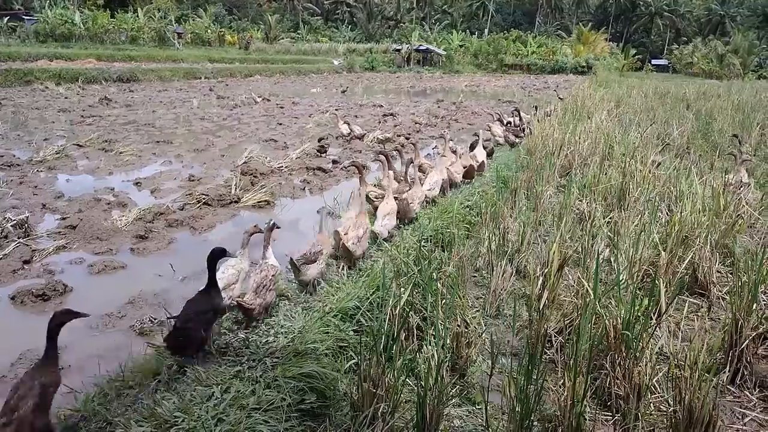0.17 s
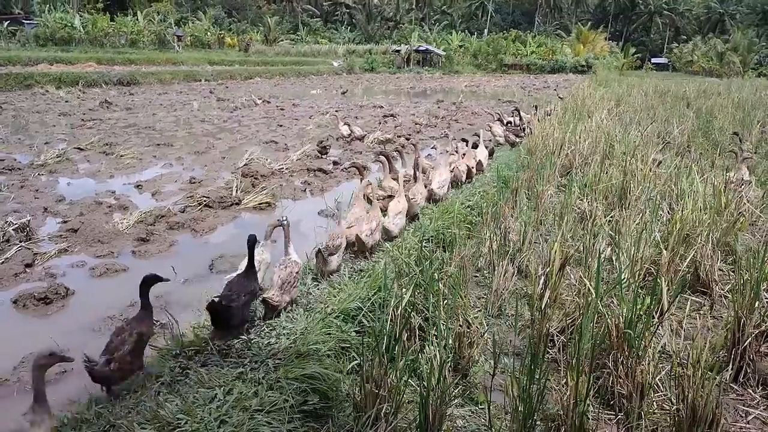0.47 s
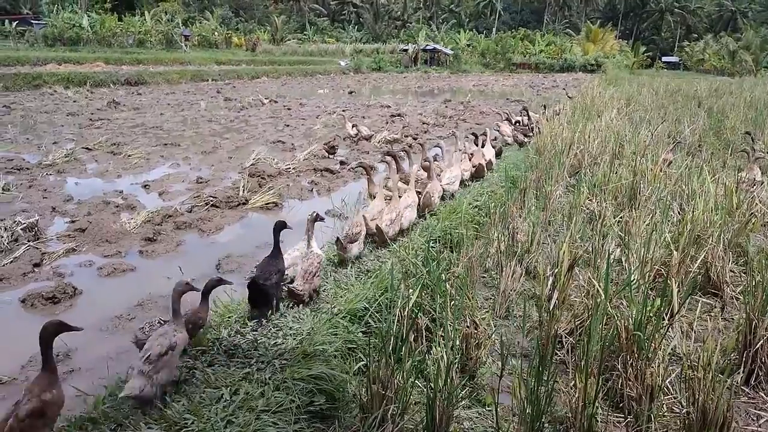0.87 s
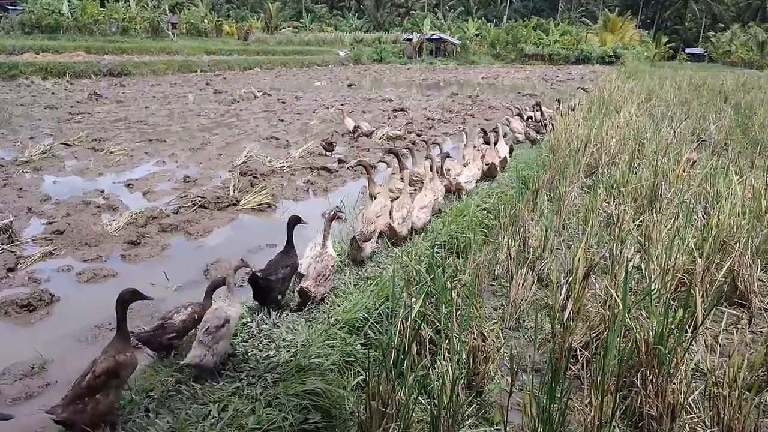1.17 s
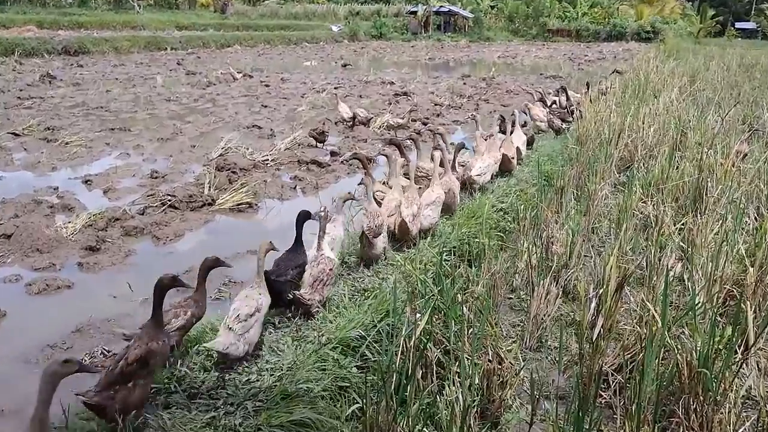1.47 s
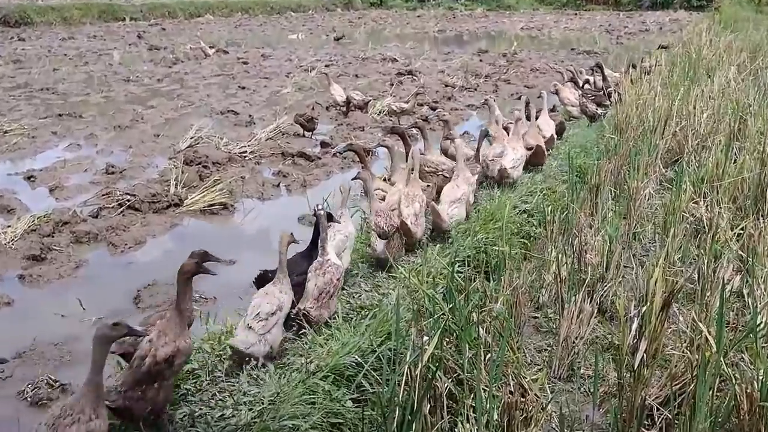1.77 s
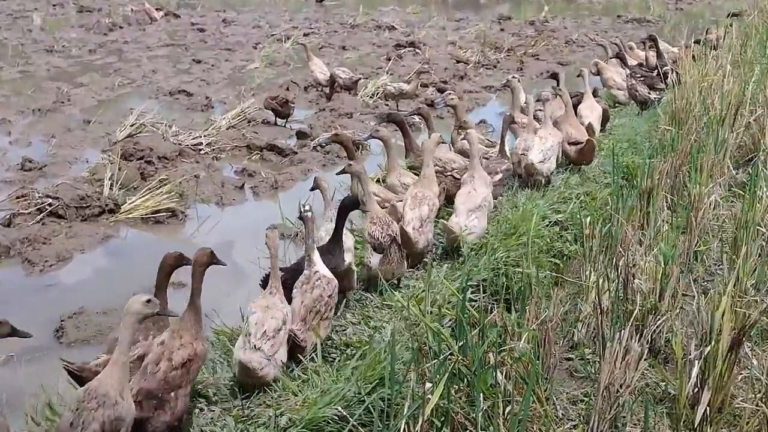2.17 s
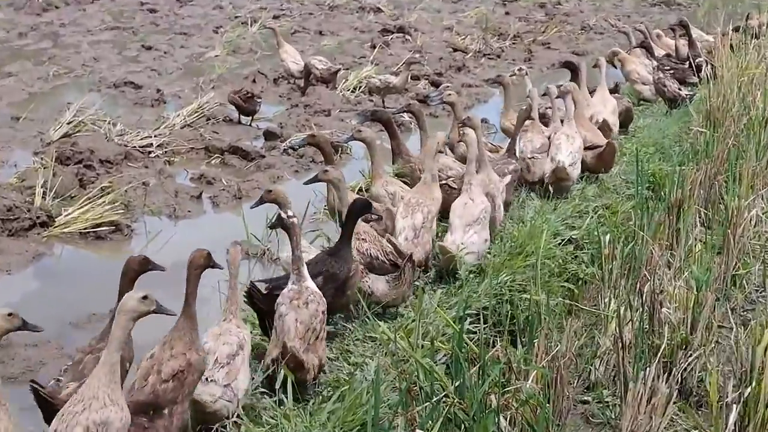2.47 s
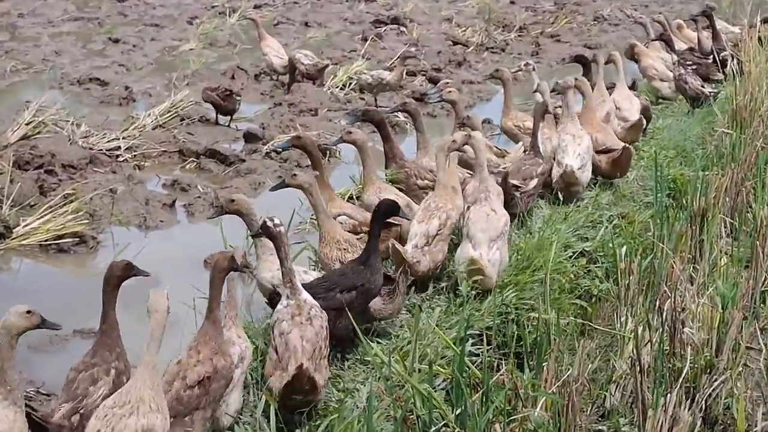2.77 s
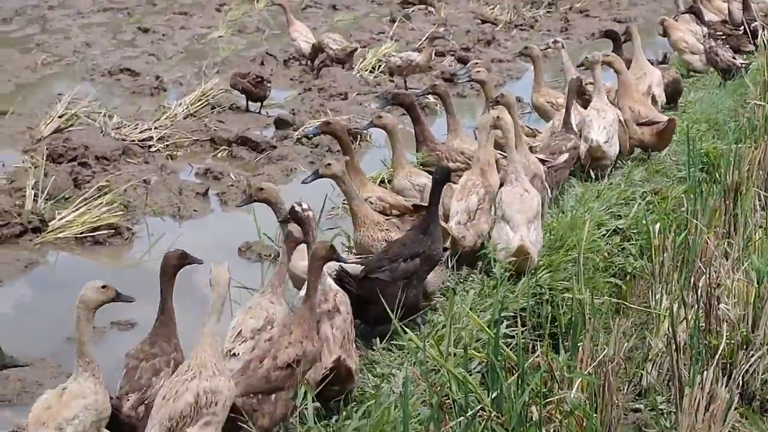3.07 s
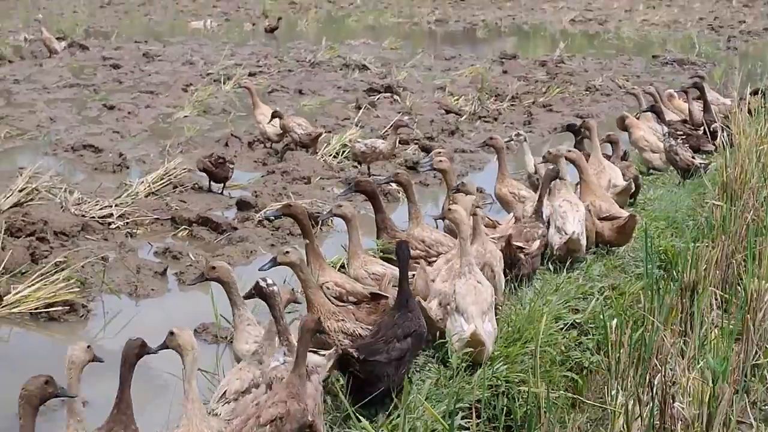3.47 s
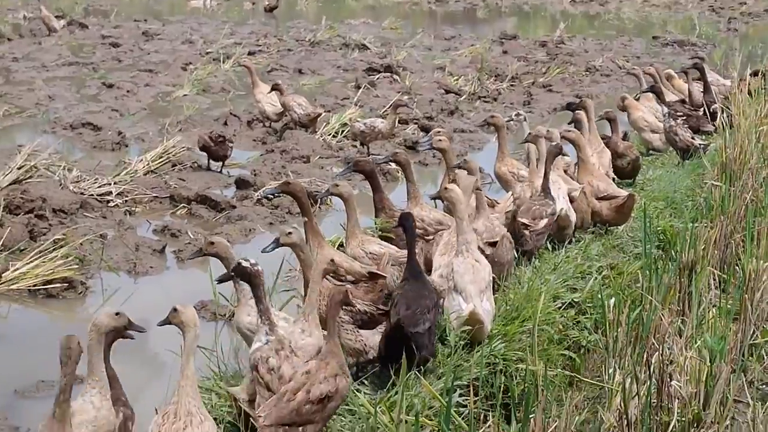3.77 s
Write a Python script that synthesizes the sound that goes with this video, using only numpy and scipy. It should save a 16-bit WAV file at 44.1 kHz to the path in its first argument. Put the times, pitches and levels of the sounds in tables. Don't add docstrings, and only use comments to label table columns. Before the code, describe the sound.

Ducks quack throughout in very short, buzzy bursts, with low mutters and a continuous murmur from the flock behind. Hoarse, raspier quacks stand out around 0.6 and 0.8 s. A brief gritty scrape with ticks touches the microphone at 1.0 s, and a small dull knock falls at 2.6 s. Open-field hiss, faint insect fizz, low wind rumble and a distant engine drone lie underneath to about 3.9 s.

```python
import sys
import numpy as np
from scipy import signal
from scipy.fft import rfft, irfft, next_fast_len
from scipy.io import wavfile
from scipy.ndimage import uniform_filter1d, map_coordinates

SR = 44100
rng = np.random.default_rng(int(sys.argv[2]) if len(sys.argv) > 2 else 0)


def level_to_linear(level):
    exponent = np.asarray(level, float) / 20
    return 10 ** exponent


def unload_audio(sound):
    columns = np.transpose(np.atleast_2d(sound))
    steps = np.round(np.clip(columns, -1, 1) * 32767)
    wavfile.write(sys.argv[1], SR, steps.astype(np.int16))


N = 173313
CLEAR = .04
HISS_TOP_HZ = 14350

# start in seconds, length in seconds, level in dB, pulse rate in Hz, throat in Hz.
LEADER_CALLS = [(.173, 0.048, -38, 162.4, 1425), (.267, 0.054, -41, 163, 1423),
                (.395, 0.055, -36, 153.3, 1495), (.636, 0.041, -33.5, 173.5, 1465),
                (.925, 0.042, -42, 154.3, 1450), (1.118, .068, -35.5, 142.8, 1445),
                (1.367, 0.074, -37, 152.7, 1540), (1.403, 0.073, -33, 146.8, 1427),
                (1.629, 0.056, -41.5, 142.2, 1325), (1.658, 0.052, -33, 170, 1473),
                (1.906, 0.062, -38.5, 168.7, 1530), (2.112, 0.0235, -38.5, 146.5, 1565),
                (2.158, 0.049, -36, 195.8, 1390), (2.387, 0.047, -37, 208, 1496),
                (2.524, .06, -39, 224.4, 1500), (2.818, 0.039, -42, 122.2, 1480),
                (3.02, 0.073, -40.5, 130.2, 1440), (3.363, 0.045, -48, 90.9, 1330)]
# ratio to the throat pitch, width in Hz, level in dB.
LEADER_THROAT = [(.6, 200, -14), (1.0, 165, 0), (1.25, 165, -4.5), (1.55, 220, -14)]


def leader():
    return placed(bird(LEADER_CALLS, LEADER_THROAT, CLEAR), pan_db=-3.6, lead_s=.00008)


# start in seconds, length in seconds, level in dB, pulse rate in Hz, throat in Hz.
CENTRE_CALLS = [
    (1.152, .052, -37, 157.3, 1440),
    (3.398, 0.064, -37.5, 159.7, 1423),
    (3.48, 0.049, -44.5, 110.4, 1490),
    (3.661, .042, -39, 154.7, 1427),
    (3.844, 0.034, -46.5, 148.6, 1350),
    (3.861, 0.054, -38.5, 157.9, 1436),
]
# ratio to the throat pitch, width in Hz, level in dB.
OPEN_THROAT = [(.59, 170, -8), (1.0, 150, 0), (1.27, 160, -3), (1.56, 170, -6)]
# start in seconds, length in seconds, level in dB, pulse rate in Hz, throat in Hz.
NASAL_CALLS = [
    (1.727, .064, -39.5, 241.8, 1477),
    (2.977, .052, -41, 235.3, 1423),
]
# ratio to the throat pitch, width in Hz, level in dB.
NASAL_THROAT = [(.64, 170, -1), (1.0, 210, -2), (1.26, 210, -2), (1.54, 175, 0)]


def birds_ahead():
    caller = bird(CENTRE_CALLS, OPEN_THROAT, CLEAR)
    nasal = bird(NASAL_CALLS, NASAL_THROAT, rough=.015, extra_db=2.5)
    return placed(caller + nasal, pan_db=-1.0, lead_s=-0.000076)


# start in seconds, length in seconds, level in dB, pulse rate in Hz, throat in Hz.
RASPY_CALLS = [
    (.324, 0.0536, -40, 186, 1800),
    (.789, .044, -31.5, 236, 1790),
]
HOARSE_CALLS = [
    (.601, 0.056, -34, 162.8, 1475),
]
# start in seconds, length in seconds, level in dB, pulse rate in Hz, throat in Hz.
LOW_CALLS = [
    (.772, .03, -45, 206, 990),
    (.823, 0.044, -44.5, 149.7, 1110),
    (2.34, .042, -45, 158.5, 1020),
    (2.522, 0.032, -39.5, 221.2, 1070),
    (2.705, .035, -49, 169.4, 920),
]
# ratio to the throat pitch, width in Hz, level in dB.
RASPY_THROAT = [(.59, 201, -3.5), (1.0, 180, 2), (1.24, 200, 3)]
# pitch in Hz, width in Hz, level in dB.
HOARSE_RASP = [(4860, 940, 19.5), (5820, 1100, 20), (7300, 2700, 6), (8930, 500, 1.5)]


def birds_aside():
    raspy = bird(RASPY_CALLS, RASPY_THROAT, CLEAR, HOARSE_RASP, extra_db=5)
    low = bird(LOW_CALLS, SHUT_THROAT, CLEAR, extra_db=7.5)
    hoarse = bird(HOARSE_CALLS, OPEN_THROAT, CLEAR, HOARSE_RASP, extra_db=5)
    return placed(raspy + low + hoarse, pan_db=-2.5, lead_s=0.00019)


# start in seconds, length in seconds, level in dB, pulse rate in Hz, throat in Hz.
MUTTER_CALLS = [(0, 0.056, -51.5, 180.5, 1270), (.138, 0.059, -40.5, 165, 1190),
                (.495, .055, -45.5, 159.5, 1190), (.856, 0.047, -39.5, 193.5, 1280),
                (1.194, 0.039, -44.5, 122, 1340), (2.093, 0.045, -43.5, 165.4, 1070),
                (2.387, 0.043, -38, 212.6, 1975), (2.427, 0.038, -46.5, 151.5, 1070),
                (3.046, 0.0304, -45, 192.6, 1710), (3.088, 0.045, -44.5, 167.4, 1280),
                (3.125, 0.051, -37, 212.3, 1424), (3.562, 0.051, -49, 97, 1355),
                (3.618, 0.069, -44.5, 192.8, 1600)]
# ratio to the throat pitch, width in Hz, level in dB.
SHUT_THROAT = [(0.762, 226, 8.3), (1.0, 242, 18.6), (1.28, 210, 11)]
# start in seconds, length in seconds, level in dB, pulse rate in Hz, throat in Hz.
THIN_CALLS = [
    (.685, 0.067, -60, 160, 1500),
    (1.95, 0.039, -43, 191, 1610),
    (1.985, 0.083, -64, 170, 1620),
    (2.682, 0.059, -47.5, 154.5, 1530),
]
# ratio to the throat pitch, width in Hz, level in dB.
THIN_THROAT = [(.54, 200, -10.5), (1.0, 109, 4)]


def quiet_birds():
    quiet = bird(MUTTER_CALLS, SHUT_THROAT, CLEAR) + bird(THIN_CALLS, THIN_THROAT, CLEAR)
    return placed(quiet, pan_db=0.5, lead_s=.00009)


def far_flock():
    luck = rng.random((240, 5))[:int(32 * N / SR)]
    calls = [(a * N / SR, 0.06 + 0.04 * b, -66.5 + 3 * c, 120 + 110 * d, 1200 + 380 * e)
             for a, b, c, d, e in luck]
    far = np.array([bird(calls[k::2], SHUT_THROAT, rough=.25) for k in range(2)])
    return 0.72 * far + 0.1 * far[::-1]


# pitch in Hz, width in Hz, level in dB.
BILL_RASP = [(2850, 1000, 7.5), (4390, 720, 8), (5606, 360, 9.5), (7650, 1100, 4), (9550, 2700, -9),
             (13300, 12000, -5)]


def bird(calls, throat, rough, bill=BILL_RASP, extra_db=0.0):
    out = np.zeros(N)
    for s, length, db, rate_hz, throat_hz in calls:
        add(out, s, quack(length, db, rate_hz, throat_hz, throat, rough, bill, extra_db))
    return out


def quack(length, db, rate_hz, throat_hz, throat, rough, bill, extra_db):
    rise, fall = .32, .55
    usual_hz, edge_hz = 165, 2680
    chance = rng.standard_normal((4, 4500))
    u = np.arange(4500) / SR / length
    t = np.arange(500) / SR

    hump = .12 * (rate_hz / usual_hz) ** 2 * (.25 - np.clip(2 * u - .8, -1.3, 1.3) ** 2)
    jitter = .018 * unit(uniform_filter1d(chance[0], size=200))
    cycle = np.cumsum(rate_hz * (1 + hump + jitter)) / SR + .8
    swell = np.sin(np.pi / 2 * np.clip(np.minimum(u / rise, (1 - u) / fall), 0, 1))

    at = np.flatnonzero((np.diff(np.floor(cycle), prepend=0) > 0) & (u < 1))
    hz = throat_hz * (1 - .11 * (1 - swell[at]))[:, None]
    rings = 0
    for ratio, width, gain in throat:
        fade = width * width * t * np.exp(-1.5 * np.pi * width * t)
        rings = rings + level_to_linear(gain) * fade * np.sin(2 * np.pi * ratio * hz * t)
    rings = rings * (swell[at] * level_to_linear(1.8 * chance[1, at]))[:, None]
    places = at[:, None] + np.arange(len(t))
    voice = np.bincount(places.ravel(), rings.ravel(), len(u))[:len(u)]

    puffs = swell * chance[2:] * np.exp(-2.5 * (cycle % 1))
    breath = filtered(puffs[0], resonances([(c * throat_hz, 0.51 * w, g) for c, w, g in throat]))
    rasp_db = -21 + extra_db + 0.028 * (rate_hz - usual_hz)
    rasp = level_to_linear(rasp_db) * unit(filtered(swell * puffs[1], resonances(bill)))
    blend = np.sqrt(1 - rough) * unit(voice) + np.sqrt(rough) * unit(breath)
    body = filtered(blend, lambda f: 1 / (1 + (f / edge_hz) ** 10))
    return level_to_linear(db) * np.sqrt(length * SR / len(u)) * (body + rasp)


def banks(x):
    t = np.arange(SR // 4) / SR
    tail = rng.standard_normal((2, len(t))) * level_to_linear(-60 * t / 0.15) * (t > .004)
    return signal.fftconvolve(x, tail / np.linalg.norm(tail[0]), axes=1)[:, :N]


# start in seconds, length in seconds, level in dB.
SCRAPES = [
    (1.008, 0.0037, -42),
    (1.03, 0.0173, -41.5),
]
# time in seconds, level in dB, pitch in Hz, ring in cycles.
TICKS = [
    (1.009, -41, 5500, 1.2),
    (1.011, -41, 7000, 1.6),
    (1.028, -49, 5430, 3.5),
    (1.0334, -52, 8800, 1.6),
    (1.0378, -54, 4670, 3.6),
    (.72, -58, 8100, 6.9),
    (1.2135, -57, 5400, 6.0),
    (1.2134, -56, 9300, 7.0),
    (2.638, -42.5, 1570, 1.4),
]
# pitch in Hz, level in dB per Hz.
GRIT_COLOUR = [(290, -40), (500, -4), (797, -4), (1970, -12), (3140, -5), (15000, -22.5), (16300, -35)]


def stalk():
    out, t = np.zeros(N), np.arange(300) / SR
    uneven = rng.standard_normal(N) * level_to_linear(1.6 * rng.standard_normal(N))
    grit = unit(filtered(uneven, lambda hz: level_to_linear(along(GRIT_COLOUR, hz))))
    for s, length, db in SCRAPES:
        add(out, s, level_to_linear(db) * grit[round(s * SR):][:round(length * SR)])
    for s, db, hz, cycles in TICKS:
        pace = hz / cycles
        add(out, s, level_to_linear(db + 26.5) * np.sin(2 * np.pi * hz * t) * t * pace * np.exp(-2 * t * pace))
    return placed(out, pan_db=-6.0, lead_s=.00002)


# pitch in Hz, level in dB per Hz.
FIZZ_COLOUR = [(10500, 14), (12000, 14), (13600, 21), (14300, 4)]
# time in seconds, level in dB.
FIZZ_LEVEL = [(0, -76), (.2, -65.5), (1.0, -61.5), (1.9, -62), (2.2, -68.5), (2.7, -61), (3.1, -68.5),
              (3.93, -73)]


def bright_fizz():
    return level_to_linear(curves(FIZZ_LEVEL)[0] + 1.6 * wobble(27)) * rush(FIZZ_COLOUR, patchy_db=1.5)


# time in seconds, then one level in dB for each order.
DRONE_LEVEL = [(0, -87, -55.5, -72), (2.0, -55.5, -55.5, -58), (2.95, -43, -51.5, -103),
               (3.4, -48.5, -61, -59), (3.55, -46, -55, -48.5), (3.93, -50, -49, -50.5)]
DRONE_HZ = [56.03, 74.6, 174]


def engine():
    out = np.zeros(N)
    for hz, db in zip(DRONE_HZ, curves(DRONE_LEVEL)):
        level = np.sqrt(2) * level_to_linear(db + 1.5 * wobble(5.8))
        turns = np.cumsum(hz * (1 + 0.015 * wobble(7))) / SR
        out += level * np.sin(2 * np.pi * turns)
    return out


# pitch in Hz, level in dB per Hz.
RUMBLE_COLOUR = [(12, -82), (20, -4.5), (64, -1), (97, -5), (286, -8.5), (365, -11.5), (392, -14.5),
                 (600, -21.5), (780, -25), (1320, -120)]
# time in seconds, level in dB.
WIND_LEVEL = [(0, -56), (.15, -46), (.8, -46.5), (2.0, -46.5), (3.0, -47), (3.93, -43.5)]


def wind():
    level = level_to_linear(curves(WIND_LEVEL)[0] + 0.5 + 1.1 * wobble(6.3))
    return level * rush(RUMBLE_COLOUR, patchy_db=0.9) * level_to_linear([[0.5], [-0.5]])


# pitch in Hz, level in dB per Hz.
AIR_COLOUR = [(240, -39), (450, -9), (1000, -3.5), (1900, -5.5), (2400, -12.5), (4300, -21.5),
              (10500, -27.5), (14300, -58)]
# time in seconds, level in dB.
AIR_LEVEL = [(0, -69), (.13, -58.5), (.2, -52.5), (1.0, -55.5), (2.0, -55.5), (3.93, -54.5)]


def air():
    return level_to_linear(curves(AIR_LEVEL)[0] + 5.0 + 0.76 * wobble(4.68)) * rush(AIR_COLOUR, patchy_db=3.0)


def sag():
    t = np.arange(N) / SR
    return .034 * np.exp(-((t - .17) / .16) ** 2 / 2) * [[0], [1]]


# pitch in Hz, left-right likeness from -1 to 1.
ALIKE = [(30, .85), (60, .9), (250, .85), (600, .55), (1650, -.1), (4500, .15), (7000, .82), (15000, .85)]


def rush(spectrum, patchy_db):
    z = signal.stft(rng.standard_normal((2, N)), nperseg=512)[2]
    field = uniform_filter1d(rng.standard_normal(z.shape[1:]), size=8, axis=0)
    field = uniform_filter1d(field, size=10, axis=1)
    pair = signal.istft(z * level_to_linear(patchy_db * unit(field)), nperseg=512)[1][:, :N]

    def share(hz):
        turn = np.arccos(np.clip(along(ALIKE, hz), -1, 1)) / 2
        return level_to_linear(along(spectrum, hz)) * [np.cos(turn), np.sin(turn)]

    mid, side = filtered(pair, share)
    return unit(np.array([mid + side, mid - side]))


def placed(x, pan_db, lead_s):
    def ports(hz):
        lead = lead_s / (1 + (hz / 5500) ** 6)
        return level_to_linear([[pan_db / 2], [-pan_db / 2]]) * np.exp(1j * np.pi * hz * lead * np.array([[1], [-1]]))

    return filtered(x, ports)


def resonances(peaks):
    return lambda f: sum(level_to_linear(g) * (1j * f * w / (c * c - f * f + 1j * f * w)) ** 2 for c, w, g in peaks)


def filtered(x, response):
    m = next_fast_len(x.shape[-1] + 4096)
    return irfft(rfft(x, m) * response(np.fft.rfftfreq(m, 1 / SR)), m)[..., :x.shape[-1]]


def unit(x):
    return x / np.sqrt(np.mean(x ** 2) + 1e-20)


def along(points, hz):
    f, v = np.transpose(points)
    return np.interp(np.log(hz + 1), np.log(f + 1), v)


def curves(rows):
    s, *cols = np.transpose(rows)
    return [np.interp(np.arange(N) / SR, s, c) for c in cols]


def wobble(rate):
    knots = rng.standard_normal(int(N * rate / SR) + 4)
    return map_coordinates(knots, [np.arange(N) * rate / SR])


def add(into, s, x):
    part = into[..., max(round(s * SR), 0):][..., :x.shape[-1]]
    part += x[..., :part.shape[-1]]


def scene():
    ducks = leader() + birds_ahead() + birds_aside() + quiet_birds() + far_flock()
    echo = filtered(banks(ducks), lambda hz: 1 / (1 + (hz / 5000) ** 4))
    hissy = ducks + level_to_linear(-11.5) * echo + bright_fizz() + air()
    return filtered(hissy, lambda hz: hz < HISS_TOP_HZ) + stalk() + engine() + wind() + sag()


def roll_off(x):
    return signal.sosfilt(signal.butter(12, 16480, fs=SR, output="sos"), x)


def record(dry):
    return roll_off(dry)


dry = scene()
out = record(dry)
unload_audio(out)
```